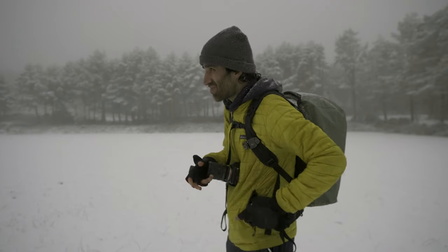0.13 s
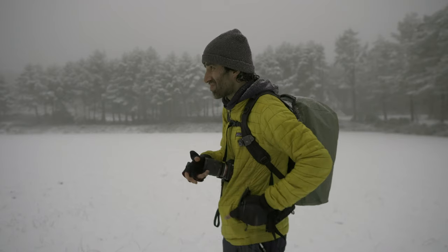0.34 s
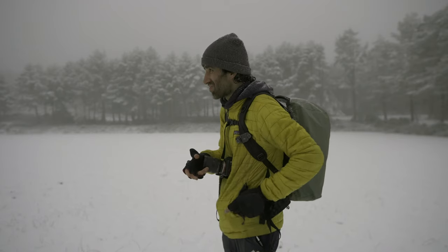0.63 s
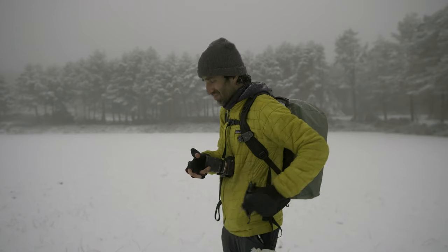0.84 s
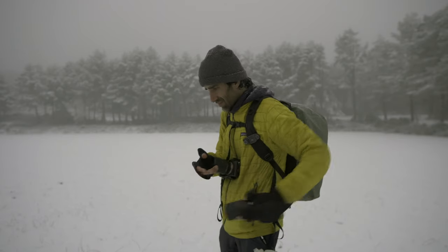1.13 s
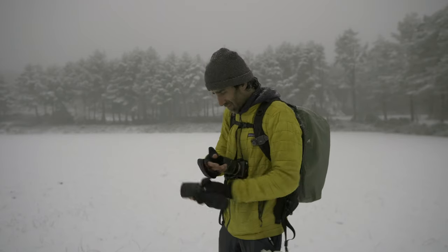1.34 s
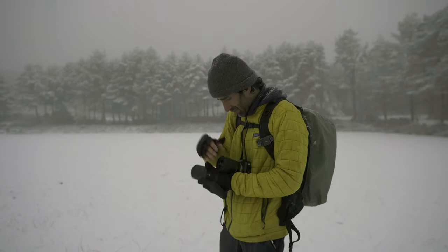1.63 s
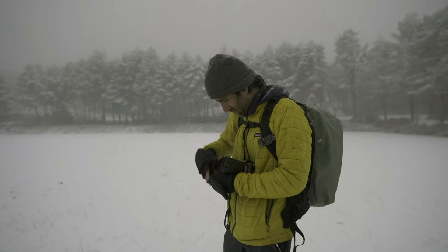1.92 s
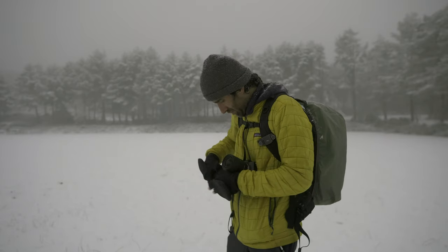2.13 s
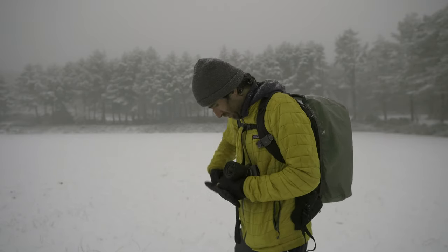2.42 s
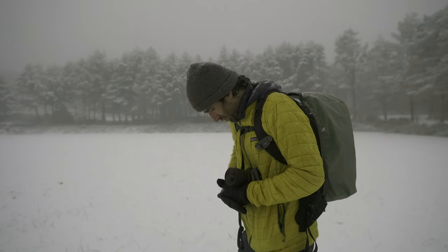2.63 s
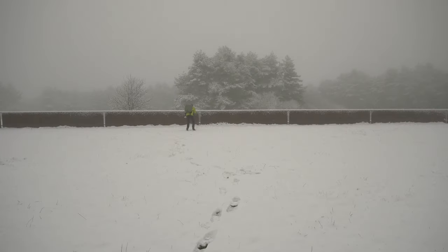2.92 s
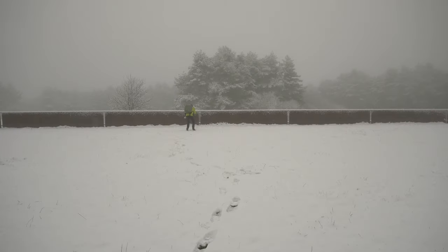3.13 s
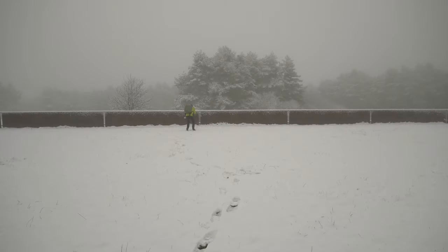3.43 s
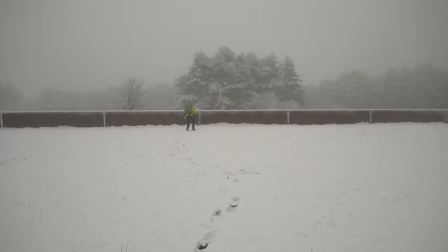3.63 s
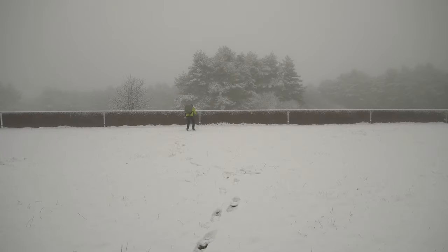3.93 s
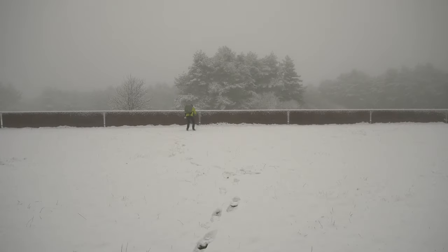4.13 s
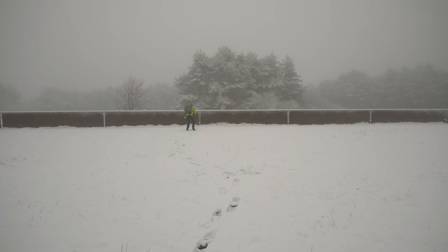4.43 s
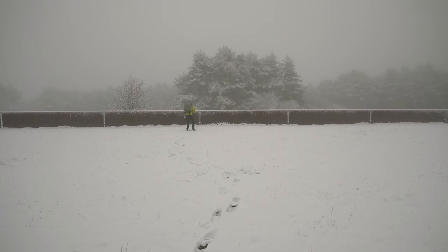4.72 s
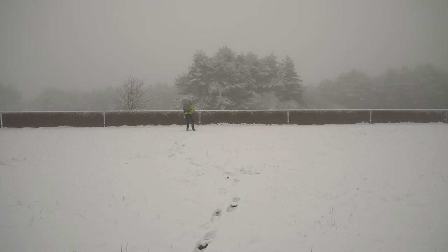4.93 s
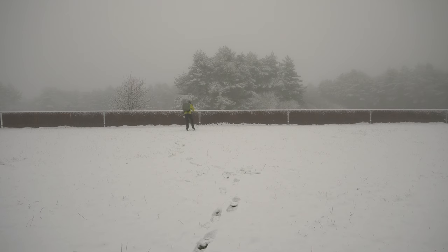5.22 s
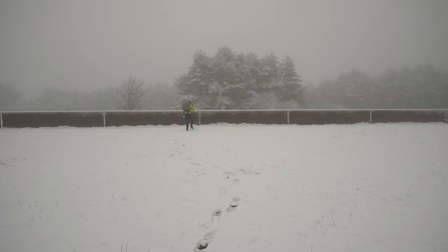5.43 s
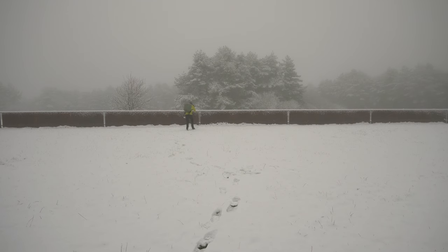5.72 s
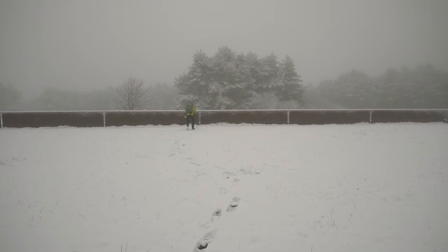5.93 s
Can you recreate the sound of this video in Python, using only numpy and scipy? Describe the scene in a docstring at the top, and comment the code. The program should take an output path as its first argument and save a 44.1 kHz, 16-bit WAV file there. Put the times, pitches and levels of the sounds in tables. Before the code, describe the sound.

Wind pushes on a microphone in an open snowfield, making a continuous soft, low rumble that swells in short, uneven gusts. Hard icy grains strike the housing with crisp, bright ticks and tiny knocks, scattered among fine crackling flurries. The pelting is thickest from about one to three seconds, then sparser. A very soft hiss of drifting snow lies underneath.

```python
"""Wind and driven snow on a microphone

Eddies buffet the windscreen in an open snowfield: a steady low rumble, lifted and tilted by gusts.
It is filtered noise, coloured by hollows round the capsules and a little different left and right.
Icy grains strike the housing: crisp noise-burst ticks with a small knock of damped sines, amid flurries
of finer grains built from random impulses. Drifting snow hisses softly; thin sine whistles are barely heard."""
import sys
import numpy as np
from scipy import signal
from scipy.fft import rfft, irfft, next_fast_len
from scipy.io import wavfile
from scipy.ndimage import uniform_filter1d

SR = 44100
rng = np.random.default_rng(int(sys.argv[2]) if len(sys.argv) > 2 else 0)


def dump(signal):
    """Clip the signal to [-1, 1] and save it as 16-bit WAV at the path in sys.argv[1]."""
    limited = np.clip(np.atleast_2d(signal).T, -1, 1)
    pcm = np.round(limited * 32767).astype(np.int16)
    wavfile.write(sys.argv[1], SR, pcm)


N = 268039
T = np.arange(N) / SR
SIZE = next_fast_len(N)
HZ = np.maximum(np.arange(SIZE // 2 + 1) * SR / SIZE, 1)
# how far grains stray to the left or right: spread of left minus right [dB]
STRAY_DB = 1.3


def undb(db):
    """Decibels to gain."""
    return 10 ** (np.asarray(db) / 20)


def unit(x):
    """Scale to rms 1."""
    return x / np.sqrt(np.mean(x ** 2))


def colour(points):
    """Gain at every frequency from (frequency [Hz], level [dB]) points, joined on a log frequency axis."""
    hz, db = np.transpose(points)
    return undb(np.interp(np.log(HZ), np.log(hz), db))


def shape(x, gain):
    """Filter by a gain at every frequency."""
    return irfft(rfft(x, SIZE) * gain, SIZE)[..., :N]


def walk(rate):
    """Random levels, `rate` new ones a second, slewed twice into a smooth wander of rms 1."""
    hold = int(SR / rate)
    levels = np.repeat(rng.standard_normal(N // hold + 1), hold)
    slewed = uniform_filter1d(uniform_filter1d(levels, hold), hold)
    return unit(slewed[:N])


def steady(x, seconds):
    """Even out a stereo sound: hold the rms of its mono sum at 1 over a sliding window."""
    power = uniform_filter1d(x.mean(axis=0) ** 2, int(seconds * SR))
    return x / np.sqrt(power)


def fade(x, seconds):
    """Give every impulse an exponential tail."""
    return signal.lfilter([1], [1, -np.exp(-1 / (seconds * SR))], x)


def gust_lift():
    """Each gust is one smooth swell or dip: level changes in dB for the buffeting and for the rush."""
    # gusts: (middle [s], half length [s], lift of the deep buffeting [dB], lift of the rush above it [dB])
    gust_table = [(0.277, 0.089, -3, 2.5), (0.394, 0.073, 7, 1), (0.847, 0.096, 3.5, 1),
                  (1.34, 0.22, 4, 0.9), (1.62, 0.08, -2, 2), (1.798, 0.14, 4, 1), (2.03, 0.22, -0.5, 2.5),
                  (2.38, 0.11, 5, 0), (2.986, 0.049, -5, 4), (3.167, 0.24, 6, 0), (3.53, 0.14, 5, .5),
                  (4.72, 0.15, 5, 0), (4.866, 0.077, -1.5, 2.5), (5.1, .16, 1.5, 1.5),
                  (5.474, 0.22, 5, 0.5), (5.67, 0.097, 7.5, .5)]
    lift = 0
    for middle, half_length, *db in gust_table:
        swell = np.cos(np.pi / 2 * np.clip((T - middle) / half_length, -1, 1)) ** 2
        lift = lift + np.outer(db, swell)
    return lift


def hollows():
    """The flow rings the hollows round the capsules: resonant gain at every frequency, left and right."""
    # resonances: (frequency [Hz], width [Hz], left lift [dB], right lift [dB])
    hollow_modes = [(263, 5.1, 5, 3.5), (364, 31, 6.5, 2.5), (410, 37, 7, -1), (873, 110, 0, 3.5)]
    lift = 0
    for hz, width, left, right in hollow_modes:
        lift = lift + np.array([[left], [right]]) / (1 + (2 * (HZ - hz) / width) ** 2)
    return undb(lift)


def wind(split_hz=110, air_hz=750, buffet_db=-43, rush_db=-42, air_db=2,
         buffet_flutter_db=1.1, rush_flutter_db=0.87, air_flutter_db=1.5):
    """Large eddies push both capsules together; smaller ones reach each on its own and flutter."""
    # rumble of the flow round the windscreen: (frequency [Hz], relative level per Hz [dB])
    wind_colour = [(22, -6), (31, -3), (42, -5.5), (66, 5.5), (92, -1), (115, -6), (165, -6.5), (250, -10),
                   (330, -13.5), (450, -17), (600, -24), (900, -33.5), (1800, -50), (3500, -61.5),
                   (16000, -93.5)]
    # how much the two sides differ: (frequency [Hz], side minus mid [dB])
    wind_side = [(40, 0), (65, -13), (110, -6), (200, -6), (400, -4.5), (900, -3), (2500, -3)]
    # balance before the hollows colour it: (frequency [Hz], left minus right [dB])
    wind_lean = [(50, -1), (110, 2.5), (220, -0.5), (500, 1), (750, 2.5), (1100, 0)]
    # finest eddies, before air_db and the flutter are added: (time [s], level [dB])
    air_levels = [(0.0, -63), (0.81, -61), (1.1, -64), (1.71, -63.5), (2.27, -66), (2.64, -63), (3.44, -65),
                  (3.74, -64), (4.16, -67), (4.52, -63), (5.81, -66), (6.08, -61.5)]

    mid, side = rng.standard_normal((2, N))
    side = shape(side, colour(wind_side))
    lean = np.sqrt(colour(wind_lean))
    tone = colour(wind_colour) * hollows() * np.array([lean, 1 / lean])
    flow = shape(np.array([mid + side, mid - side]), tone)

    # three bands: deep buffeting, the rush above it, and the airy top
    deep = 1 / (1 + (HZ / split_hz) ** 8)
    high = 1 / (1 + (air_hz / HZ) ** 6)
    buffet, rush, air = (shape(flow, gain) for gain in (deep, 1 - deep - high, high))

    buffet_lift, rush_lift = gust_lift()
    buffet = steady(buffet, 0.11) * undb(buffet_db + buffet_lift + buffet_flutter_db * walk(24.86))
    rush = steady(rush, 0.16) * undb(rush_db + rush_lift + rush_flutter_db * walk(30))
    air_level = np.interp(T, *np.transpose(air_levels)) + air_db
    air = unit(air) * undb(air_level + air_flutter_db * walk(12))
    return buffet + rush + air


def drift(level_db=-78, side_db=-8):
    """Snow sliding over the field hisses softly: steady coloured noise with a little width."""
    # soft hiss: (frequency [Hz], relative level per Hz [dB])
    drift_colour = [(800, 11), (2000, 26), (4000, -9), (8000, 8), (12000, -1), (16000, -8)]
    mid, side = shape(rng.standard_normal((2, N)), colour(drift_colour))
    mid, side = unit(mid), undb(side_db) * unit(side)
    return np.array([mid + side, mid - side]) * undb(level_db)


def snowfall(attack_s=0.01, release_s=0.025, patter_db=-74.5):
    """Strength of the fine snow: attack, hold and release of each flurry over a thin steady patter."""
    # fine grains blown against the housing: (start of hold [s], length of hold [s], level [dB])
    flurry_table = [(0.087, 0.066, -66.5), (0.285, 0.016, -64), (0.48, 0.15, -65.5), (0.713, 0.09, -72.5),
                    (0.9, 0.27, -85), (1.292, .07, -59), (1.46, 0.29, -60.5), (1.677, 0.045, -57),
                    (1.841, 0.096, -54), (2.084, 0.029, -61.5), (2.498, .11, -56.5), (2.618, 0.14, -59),
                    (2.826, 0.078, -62), (3.034, 0.14, -58), (3.415, 0.14, -64.5), (3.658, 0.043, -67),
                    (3.88, .035, -60.5), (4.076, 0.019, -57), (4.233, .04, -64.5), (4.5, .09, -65.5),
                    (4.802, .1, -63.5), (5.094, 0.064, -61), (5.358, 0.014, -57.5), (5.461, 0.013, -64),
                    (5.658, 0.018, -65), (5.806, 0.37, -58.5)]
    power = undb(patter_db) ** 2
    for start, length, db in flurry_table:
        early, late = np.maximum(start - T, 0), np.maximum(T - start - length, 0)
        envelope = np.exp(-early / attack_s - late / release_s)
        power = power + (undb(db) * envelope) ** 2
    return np.sqrt(power)


def flurries(per_second=230, scatter_db=7.0, crush_s=0.00046, dust_s=0.0098, dust_db=-26.0, tint_db=6.0):
    """Fine grains land at random, mostly tiny: each a very short crunch of its own colour, then trickling dust."""
    # colour of the fine grains: (frequency [Hz], relative level per Hz [dB])
    grain_colour = [(500, 3), (1200, 1.5), (2700, 2), (4300, 4.5), (5600, 5.5), (8400, 4.5), (9600, 1.5),
                    (13000, 4.5), (16000, -6.5)]
    hits = rng.random(N) < per_second / SR
    landings = hits * undb(scatter_db * np.minimum(rng.exponential(size=N), 4))
    grains = 0
    # overlapping bands from 1 to 16 kHz; each grain draws its own strength in every band
    for hz in 1000 * 2 ** np.arange(0, 4.1, 2 / 3):
        sizes = landings * undb(tint_db * np.clip(rng.standard_normal(N), -2, 2))
        envelope = fade(sizes, crush_s) + undb(dust_db) * fade(sizes, dust_s)
        crush = uniform_filter1d(envelope, size=16)  # softens the onsets
        band = np.exp(-(2 * np.log2(HZ / hz)) ** 2)
        grains = grains + shape(crush * rng.standard_normal(N), colour(grain_colour) * band)
    pan = undb(STRAY_DB * walk(40) * np.array([[.5], [-.5]]))
    return steady(pan * grains, 0.1255) * snowfall()


def tick_level(x, db, seconds=.004):
    """Give a tick the energy of a sound held at this level for the given time."""
    return x * undb(db) * np.sqrt(seconds * SR / np.sum(x ** 2))


def ticks(crush_s=0.00051, crumble_s=0.0035, crumble_db=-23, splinter_db=-14, give_share=0.57,
          mode_scatter_db=3.5):
    """A hard grain gives, shatters within about a millisecond, sheds a few crumbs and knocks the housing."""
    # hard grains, levels as in tick_level: (time [s], crack level [dB], crack centre [Hz],
    # nominal crack width [octaves], knock level [dB], knock pitch [Hz])
    tick_table = [(0.0604, -51, 9100, 1.1, -58, 1730), (0.2626, -40, 9600, 1.1, -45, 2300),
                  (0.268, -47, 8240, .6, -64, 1750), (0.347, -45, 6550, 1, -47, 1590),
                  (0.4106, -51.5, 7550, .8, -65, 1430), (0.4686, -51, 8040, 1, -66, 2200),
                  (0.4824, -42, 8400, .9, -44.5, 2100), (0.519, -50, 6300, 2.4, -72, 1850),
                  (0.5418, -45, 9100, .8, -53, 2310), (0.548, -40, 8650, 1.5, -53.5, 1360),
                  (0.5847, -37.5, 7400, 2.6, -44.5, 1520), (0.7322, -51, 7700, .8, -58, 1300),
                  (0.9605, -53.5, 12000, 1.9, -60, 2100), (1.2344, -38.5, 4150, 1.4, -43, 1530),
                  (1.2521, -47, 8300, .8, -50.5, 2330), (1.2963, -46.5, 8050, .6, -58, 1240),
                  (1.3742, -42, 6440, 2.4, -52, 1520), (1.462, -45.5, 6800, 1.1, -47, 1100),
                  (1.4798, -49, 6600, 1.6, -56, 1520), (1.5116, -49, 5460, .9, -67, 1440),
                  (1.6296, -43.5, 6100, 1.4, -52, 1770), (1.7049, -53.5, 6350, 1.4, -45.5, 1430),
                  (1.8047, -46, 5900, 1.2, -60, 1580), (1.8554, -45, 7490, .6, -53, 1210),
                  (1.902, -49, 7700, .7, -60, 1860), (1.9729, -51.5, 10600, 1, -62, 2160),
                  (2.058, -46, 9000, 1.4, -62, 1860), (2.0805, -39.5, 6900, .9, -50.5, 1950),
                  (2.089, -40.5, 6400, .7, -48.5, 1170), (2.2982, -52, 6000, 2.8, -60, 1620),
                  (2.4015, -50.5, 4870, 1.5, -49.5, 1390), (2.4559, -46, 3870, .7, -47, 1990),
                  (2.4747, -45, 8000, 2.5, -50, 1740), (2.495, -41, 8200, 1.1, -51, 2050),
                  (2.5366, -37.5, 9900, .9, -39.5, 2000), (2.5612, -41, 7600, 1.9, -55, 1690),
                  (2.5763, -41.5, 7600, .7, -48, 2470), (2.651, -45.5, 5300, .7, -48.5, 1510),
                  (2.7638, -56, 4700, 1.2, -47.5, 1440), (2.8436, -45.5, 6760, .7, -70, 1270),
                  (2.8663, -46, 8350, 1.2, -58.5, 2380), (2.9898, -46.5, 8100, 1.7, -47, 1430),
                  (3.063, -65, 6900, 1.2, -57, 1590), (3.211, -46, 8550, 3, -47.5, 1590),
                  (3.2784, -51, 8200, 1.5, -56, 1980), (3.4398, -52.5, 5460, .9, -57, 1930),
                  (3.4754, -47.5, 8600, 1.2, -72, 2070), (3.5257, -45.5, 8150, 1, -53, 1420),
                  (3.7049, -52, 6950, 3, -42, 1230), (3.7836, -51.5, 11200, 1.2, -51, 1810),
                  (3.8123, -47, 5540, 1.6, -49, 1410), (3.8602, -43.5, 5000, .7, -50.5, 1990),
                  (3.8729, -50, 5440, 1.3, -75, 2000), (3.912, -49.5, 5700, 1.1, -70, 1630),
                  (3.9537, -51.5, 8100, 1.1, -60.5, 2000), (4.0645, -46, 6000, 2.4, -49.5, 1320),
                  (4.0762, -54, 7000, 2, -66, 1980), (4.2001, -45, 4340, .9, -47, 1180),
                  (4.2295, -51.5, 9600, .7, -56, 1840), (4.239, -51, 5100, 1.1, -52.5, 2020),
                  (4.5162, -51, 8450, 2.2, -44.5, 1000), (4.7606, -37.5, 7100, .65, -68, 2010),
                  (4.7916, -46.5, 7800, 1.9, -62, 1770), (4.8378, -48.5, 5770, 1.6, -47, 1760),
                  (4.8829, -47, 10200, 1.2, -50.5, 1850), (4.9338, -44.5, 6960, 1.1, -61, 1780),
                  (4.9667, -48.5, 8260, 1, -54.5, 2820), (5.0817, -49.5, 9300, .9, -63, 1980),
                  (5.2066, -52.5, 5000, .55, -64, 1380), (5.354, -49, 8150, 3, -45, 1320),
                  (5.4558, -50.5, 6300, 1.4, -49, 1030), (5.5276, -52.5, 7050, .55, -63, 1570),
                  (5.6108, -51, 6560, 1.3, -59, 1790), (5.9328, -49.5, 9300, .75, -52.5, 1630)]
    # modes of the housing: (multiple of the knock pitch [ratio], t60 [s], relative level [dB])
    housing_modes = [(.56, 0.016, 6.5), (1, 0.0048, 18), (1.45, 0.0064, 1), (2.05, 0.0022, 3)]
    ratio, t60, mode_db = np.transpose(housing_modes)[:, :, None]

    out, t = np.zeros((2, N + SR)), np.arange(SR // 30) / SR
    lead = SR // 100  # samples of room ahead of the break
    before, after = np.maximum(lead / SR - t, 0), np.maximum(t - lead / SR, 0)
    # the break builds up faster than it dies away
    away = after + before / give_share
    crisp = signal.butter(2, [1500, 17000], "band", fs=SR, output="sos")

    for s, crack_db, crack_hz, octaves, knock_db, knock_hz in tick_table:
        fracture, crumbs = rng.standard_normal((2, len(t)))
        # cubed noise is spiky, like separate crumbs
        crumble = undb(crumble_db) * unit(crumbs ** 3) * np.exp(-away / crumble_s)
        force = fracture * np.exp(-away / crush_s) + crumble

        # a clean break rings in a narrower band; some raw splintering stays beside it
        sharpness = max(1 / octaves ** 2, crack_hz / (SR / 3))
        peak = signal.iirpeak(crack_hz, sharpness, fs=SR)
        ring = signal.lfilter(*peak, signal.lfilter(*peak, force))
        crack = signal.sosfilt(crisp, unit(ring) + undb(splinter_db) * unit(force))

        # the mix of modes varies with where the grain lands
        sign, scatter = rng.standard_normal((2, len(housing_modes), 1))
        decay = undb(mode_db + mode_scatter_db * scatter - 60 * after / t60)
        modes = decay * np.sin(2 * np.pi * ratio * knock_hz * after)
        knock = np.sum(np.sign(sign) * modes, axis=0)

        pan = undb(STRAY_DB * rng.standard_normal() * np.array([[.5], [-.5]]))
        i = max(int(s * SR) - lead, 0)
        out[:, i:i + len(t)] += pan * (tick_level(crack, crack_db) + tick_level(knock, knock_db))
    return out[:, :N]


def whistles():
    """Faint pure glides, perhaps a small bird far off: sines whose pitch bends along a parabola."""
    # glides: (start [s], length [s], start pitch [Hz], middle pitch [Hz], end pitch [Hz], peak level [dB])
    whistle_table = [(4.2, .04, 4450, 4650, 4750, -79), (4.39, .1, 4750, 4200, 4200, -77),
                     (4.445, .06, 4650, 4950, 5100, -79), (4.63, .06, 4400, 4850, 5080, -76),
                     (4.8, .05, 4700, 4430, 4400, -80), (5.09, .05, 4700, 5000, 5200, -80),
                     (5.27, .05, 4700, 4480, 4450, -81)]
    out = np.zeros(N)
    for s, length, start, middle, end, db in whistle_table:
        progress = np.clip((T - s) / length, 0, 1)
        bend = np.polyfit([0, .5, 1], [start, middle, end], 2)
        hz = np.polyval(bend, progress)
        tone = np.sin(2 * np.pi * np.cumsum(hz) / SR)
        out += undb(db) * np.sin(np.pi * progress) * tone
    return out


def scene():
    """Wind and hiss are wide; grains sound through the housing, so both sides get them nearly alike."""
    return wind() + drift() + flurries() + ticks() + whistles()


def record(dry):
    """The recorder cuts the deepest bass and the top."""
    bass_cut = signal.butter(6, 34, "high", fs=SR, output="sos")
    top_cut = signal.ellip(8, .2, 70, 16200, fs=SR, output="sos")
    return signal.sosfilt(top_cut, signal.sosfilt(bass_cut, dry))


dry = scene()
out = record(dry)
dump(out)
```